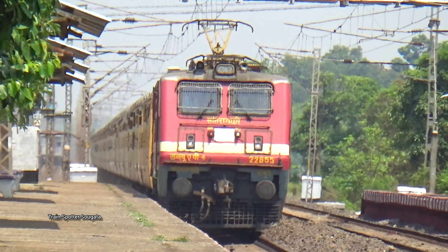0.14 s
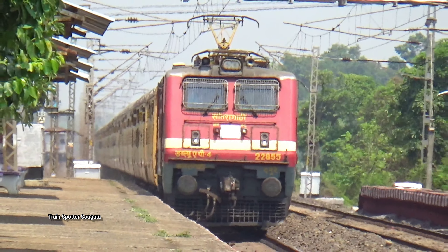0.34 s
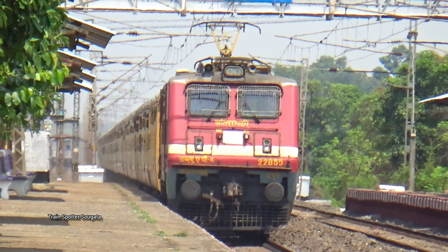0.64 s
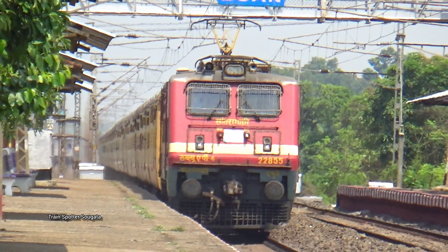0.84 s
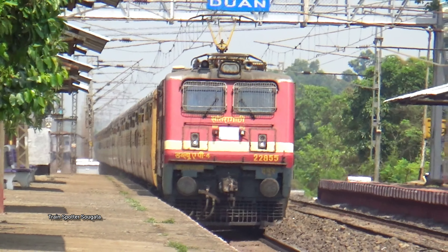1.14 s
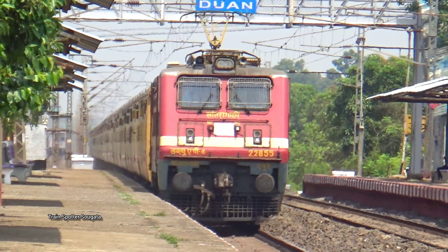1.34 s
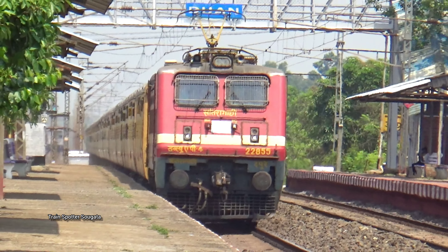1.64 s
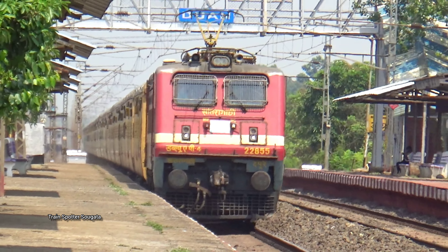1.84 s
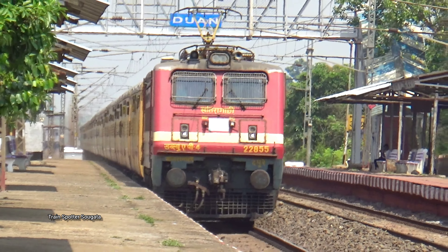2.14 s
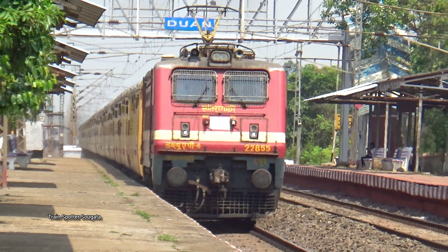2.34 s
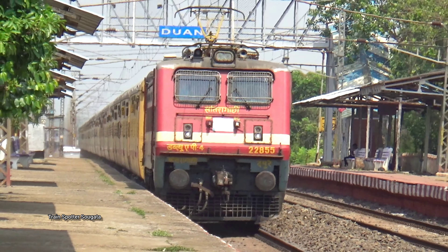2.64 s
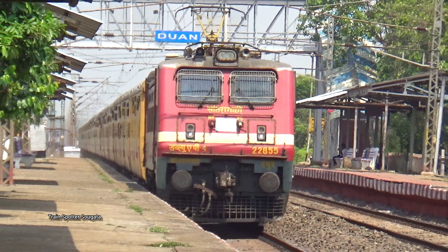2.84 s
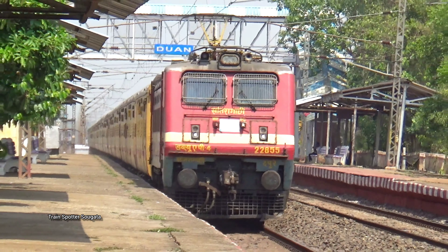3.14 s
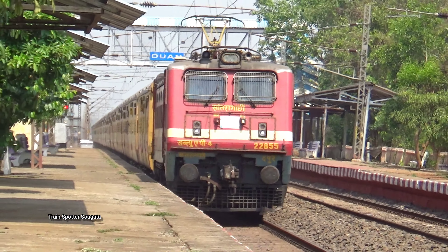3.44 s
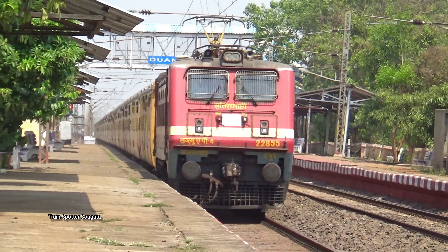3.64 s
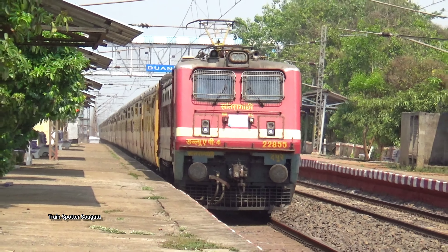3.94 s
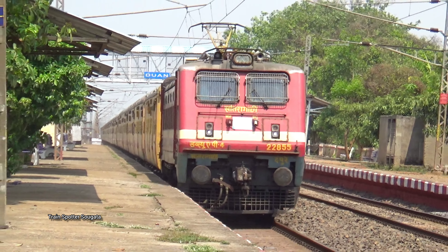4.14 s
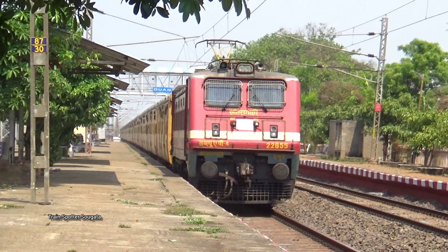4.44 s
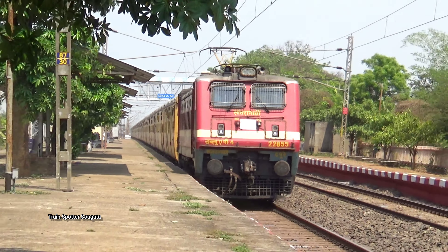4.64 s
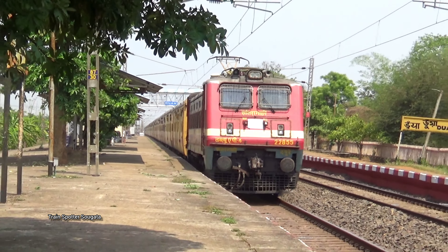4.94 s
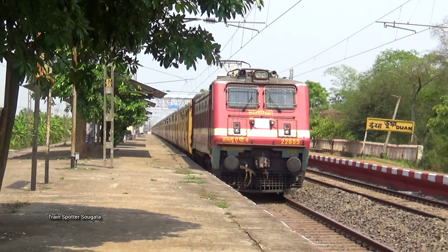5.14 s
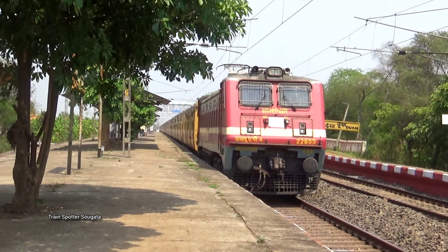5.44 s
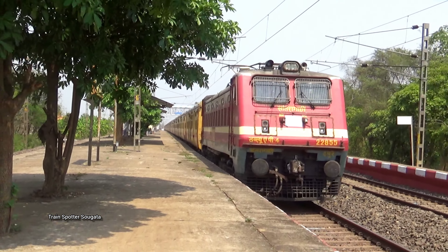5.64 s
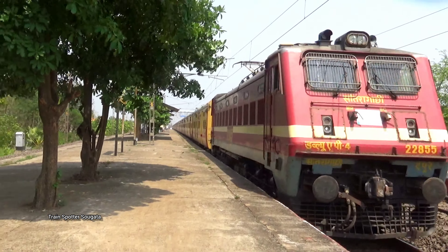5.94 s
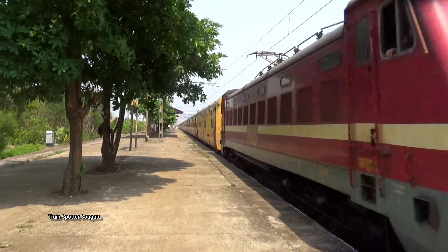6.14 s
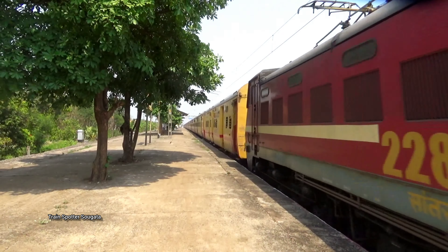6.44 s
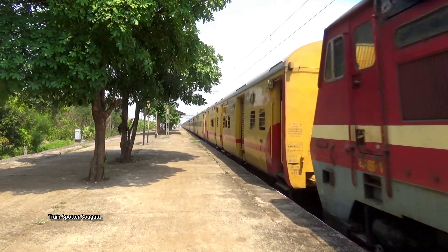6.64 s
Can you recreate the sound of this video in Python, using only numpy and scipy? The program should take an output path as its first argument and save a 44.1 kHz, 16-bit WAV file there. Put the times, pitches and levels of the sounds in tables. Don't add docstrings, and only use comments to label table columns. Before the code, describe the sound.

A handheld stereo microphone beside the track hears ringing rails, a steady motor whine and distant rolling noise growing nearer, with soft gusts and thin metallic squeaks. Then a buzzing, bright air horn takes over, its tone swept by a platform echo as the automatic level pulls the train down. After it stops, wheel sets sweep past in a dense mid-toned rush.

```python
import sys
import numpy as np
from scipy import signal
from scipy.fft import rfft, irfft, next_fast_len
from scipy.io import wavfile
from scipy.ndimage import uniform_filter1d

SR = 44100
rng = np.random.default_rng(int(sys.argv[2]) if len(sys.argv) > 2 else 0)


def transcribe(signal):
    frames = np.atleast_2d(signal).T
    limited = np.clip(frames, -1, 1)
    pcm = np.round(limited * 32767).astype(np.int16)
    wavfile.write(sys.argv[1], SR, pcm)


def volts(x):
    e = np.asarray(x, float) / 20
    return 10 ** e


N = 299439

# (time [s], level [dB])
HORN = [
    (4.215, -43),
    (4.251, -17.5),
    (4.266, -20),
    (4.32, -18.5),
    (4.361, -19),
    (5.55, -18),
    (5.887, -16.5),
    (5.95, -19.5),
    (6.24, -44),
]
# (level at the start [dB], rise while nearing [dB/s], ducking [dB], step as the wheels draw level [dB])
SONG = (-24, 2.5, 31, 5.5)
# (frequency [Hz], level [dB])
LEAN_RAILS = [(500, -2), (1000, -8), (1200, -8), (1300, -2), (3000, 0), (9000, 0)]
LEAN_HORN = [(60, -0.5), (150, -0.5), (380, -0.73), (950, 0.24), (2380, -0.52), (5980, -0.73), (15000, 0.0)]
# (frequency [Hz], phase [rad])
LEAD = [(0, 0), (1290, 0.65), (1980, 0.33), (6370, 0.68), (7240, 0.89), (7670, 0.58), (15200, 0.28)]
LEAD_HORN = [(0, 0), (600, 0.64), (2150, 0.47), (3270, 0.0053), (3530, 0.18), (5770, 0.043), (15200, 0.0)]
SONG_FULL_S = 2.98


def evened(x):
    return x / np.sqrt(np.mean(abs(x) ** 2) + 1e-20)


def read(points, hz):
    f, value = np.transpose(points)
    return np.interp(np.log(hz + 1), np.log(f + 1), value)


def curve(rows, t):
    s, *columns = np.transpose(rows)
    return [np.interp(t, s, c) for c in columns]


def bump(t, s, length):
    return np.exp(-((t - s) / length) ** 2)


def drift(t, top_hz):
    speeds = np.geomspace(top_hz / 12, top_hz, num=12)
    return evened(sum(np.sin(2 * np.pi * (f * t + rng.random())) for f in speeds))


def long_drift(t, top_hz):
    return drift(t[::64], top_hz).repeat(64)[:N]


def resonate(x, hz, width):
    turn = np.exp(2j * np.pi * hz * np.arange(x.shape[-1]) / SR)
    r = np.exp(-np.pi * width / SR)
    return 2 * (turn * signal.lfilter([1], np.convolve([1, -r], [1, -r]), x / turn)).real


def ports(pair, lean, lead):
    # (frequency [Hz], share [0-1])
    likeness = [(60, 1), (400, 0.99), (1000, 0.85), (2400, 0.92), (6000, 0.87), (15000, 0.97)]
    size = next_fast_len(N)
    hz = np.fft.rfftfreq(size, 1 / SR)
    a, b = rfft(pair, size)
    same = np.clip(read(likeness, hz), 0, 1)
    tilt = volts(read(lean, hz) / 2) * np.exp(.5j * read(lead, hz))
    left = a * tilt
    right = (same * a + np.sqrt(1 - same ** 2) * b) / tilt
    return irfft([left, right], size)[:, :N]


def noise(field_db, patchy_db, flicker_db):
    frames = N // 256 + 5
    hz = np.fft.rfftfreq(1024, 1 / SR)[:, None]
    t = np.arange(frames) * 256 / SR
    a, b, c, d, patches = rng.standard_normal((frames, 513, 5)).T
    patches = uniform_filter1d(patches, size=14, axis=0)
    patches = evened(uniform_filter1d(patches, size=12, axis=1))
    gain = volts(field_db(hz, t) + patchy_db * patches + flicker_db * drift(t, 30))
    spectra = np.array([a + 1j * b, c + 1j * d]) * gain
    return signal.istft(spectra, nperseg=1024, noverlap=768)[1][:, :N]


def layer_db(layer, t, full_s=9):
    # (time [s], share of the ducking [0-1])
    ducking = [
        (4.23, 0.04),
        (4.3, 0.65),
        (4.6, 0.8),
        (5.85, 0.88),
        (5.98, 0.68),
        (6.25, 0.66),
        (6.5, 0.49),
        (6.79, 0.58),
    ]
    level_s, level_rise_s = 6.27, 0.02
    start_db, rise_db, duck_db, level_db = layer
    wheels = 1 / (1.5 + np.exp((level_s - t) / level_rise_s))
    nearing_db = rise_db * np.minimum(t, full_s)
    return start_db + nearing_db - duck_db * curve(ducking, t)[0] + level_db * wheels


def axles_db(t):
    # (time [s], level [dB])
    axles = [
        (6.08, 0),
        (6.19, 8.5),
        (6.34, 11),
        (6.47, 3.5),
        (6.64, 3),
    ]
    return sum(db * bump(t, s, 0.053) for s, db in axles)


def wind():
    # (frequency [Hz], density [dB/Hz])
    colour = [(20, -11), (60, -14), (150, 1.5), (300, -3), (600, -15.5), (2000, -66)]
    # (time [s], level [dB], length [s])
    gusts = [(.07, -45, 0.069), (0.266, -49, 0.083), (.6, -52, 0.15), (0.799, -40.5, 0.033),
             (1.43, -38, 0.041), (1.76, -53, .04), (3.5, -63, 0.13), (4.074, -47, 0.039),
             (4.297, -36, 0.047), (4.62, -47, 0.13), (5.13, -51, .06), (5.432, -45, 0.035),
             (5.607, -48, .04), (6.3, -51, 0.092), (6.54, -46, 0.056), (6.66, -51, .04), (6.79, -36, .05)]
    breeze_db = -52

    def field_db(hz, t):
        power = volts(2 * breeze_db) + sum(volts(2 * db) * bump(t, s, length) for s, db, length in gusts)
        return read(colour, hz) + 10 * np.log10(power)

    lumps = noise(field_db, patchy_db=0.0, flicker_db=2.5)
    return volts(-8.5) * np.array([lumps[0], 0.81 * lumps[0] + 0.52 * lumps[1]])


def yard(x):
    # (frequency [Hz], time to fall 60 dB [s])
    decay = [(300, 0.057), (1000, 0.043), (4000, 0.75), (12000, 0.55)]
    taps = np.zeros((2, SR // 2))
    slots = np.arange(400, SR // 2 - 20, 20)
    at = slots + rng.integers(0, 20, (2, len(slots)))
    np.put_along_axis(taps, at, rng.choice([-1., 1.], at.shape), 1)
    hz, t, z = signal.stft(taps, SR, nperseg=256)
    tail = signal.istft(z * volts(-60 * t / read(decay, hz)[:, None]), SR, nperseg=256)[1]
    return signal.fftconvolve(x.mean(0)[None], tail / np.linalg.norm(tail[0]), axes=1)[:, :N]


def whine():
    pitches = [523, 1079]
    levels = [-25, -6.5]
    waver_hz, swell_db = 2, 2
    t = np.arange(N) / SR
    tones = np.zeros(N)
    for hz, db in zip(pitches, levels):
        turns = np.cumsum(hz + waver_hz * long_drift(t, 12)) / SR
        tones += volts(db + swell_db * long_drift(t, 6.2)) * np.sin(2 * np.pi * turns)
    return volts(layer_db(SONG, t, SONG_FULL_S)) * ports([tones, 0 * tones], LEAN_RAILS, LEAD)


def rails():
    pitches = [494, 523, 1050, 1080, 1140, 1178, 1260, 1319, 1540, 3188, 4130, 7000, 9480]
    # (width [Hz], level [dB])
    modes = [(13.9, -29.5), (6, -34), (22, -10), (14, -8), (48.4, 1.5), (25.5, -7), (44, -23),
             (17.2, -16.5), (32, -27.5), (6, -38.5), (20, -40.5), (400, -34.5), (300, -31.5)]
    size, t = next_fast_len(N), np.arange(N) / SR
    f = np.fft.rfftfreq(size, 1 / SR)
    shake = rfft(rng.standard_normal((2, N)) * [[1], [.35]], size)
    song = np.zeros((2, N))
    for hz, (width, db) in zip(pitches, modes):
        ring = irfft(shake / (1 + 2j * (f - hz) / width) ** 2, size)[:, :N]
        song += volts(db + 1.9 * long_drift(t, 2.733)) * evened(ring)
    level_db = layer_db(SONG, t, SONG_FULL_S) + axles_db(t) - 2.0
    return volts(level_db) * ports(evened(song), LEAN_RAILS, LEAD)


def roar():
    # (time [s], share of the passing colour [0-1])
    nearness = [
        (0, 0.29),
        (4.2, 0.46),
        (5.9, 0.55),
        (6.3, 1),
        (6.8, 1),
    ]
    # (frequency [Hz], density [dB/Hz])
    far_colour = [(30, -33), (100, -46), (300, -28.5), (470, -16.5), (545, -18), (630, -17), (850, -0.5),
                  (1320, -1.5), (1370, -22), (2150, -18), (4000, -24), (6000, -35), (8200, -30.5),
                  (10500, -19), (15500, -31)]
    near_colour = [(30, -62), (120, -15.5), (400, 0.5), (900, 5.5), (1400, 0), (2200, -10), (3200, -12),
                   (5700, -23.5), (9500, -24.5), (11500, -34), (15500, -59)]
    # (frequency [Hz], level [dB])
    lean_far = [(100, -4), (400, -4.5), (1000, -1), (2400, 2.5), (8000, 0)]
    lean_near = [(60, -17), (180, 3.5), (550, -3.5), (1650, -4), (4970, -4.5), (15000, 1)]
    # (start [dB], rise [dB/s], ducking [dB], step at the wheels [dB])
    low_layer = (-39, 3.5, 20.5, 0.5)
    treble_layer = (-56.5, 3.5, 8, 3.5)

    def field_db(hz, t):
        low_db = layer_db(low_layer, t) + 0.067 * axles_db(t)
        high_db = layer_db(treble_layer, t) + 0.23 * axles_db(t)
        treble = np.clip(np.log2((hz + 1) / 1200), 0, 1)

        def levelled(colour):
            return read(colour, hz) - (1 - treble) * read(colour, 790) - treble * read(colour, 2370)

        far, near = levelled(far_colour), levelled(near_colour)
        return far + curve(nearness, t)[0] * (near - far) + low_db + treble * (high_db - low_db)

    pair = noise(field_db, patchy_db=0.92, flicker_db=0.67)
    near, = curve(nearness, np.arange(N) / SR)
    return volts(-9) * ((1 - near) * ports(pair, lean_far, LEAD) + near * ports(pair, lean_near, LEAD))


def squeals():
    # (time [s], length [s], frequency [Hz], width [Hz], level [dB])
    friction = [
        (.93, 0.052, 1900, 50, -48),
        (1.4, 0.048, 13000, 2520, -60),
        (2.19, .07, 13100, 500, -50),
        (2.3, 0.34, 13000, 120, -59),
        (3.05, 0.086, 12700, 1500, -46),
        (3.23, .06, 13000, 902.3, -52),
        (3.93, .07, 12040, 2500, -41),
    ]
    # (time [s], length [s], frequency [Hz], width [Hz], level [dB])
    puff = [
        (4.215, 0.021, 8740, 150, -31),
        (4.205, 0.055, 9250, 4000, -33),
        (4.202, .03, 14000, 1490, -45),
    ]
    # (time [s], length [s], overtone [number], level [dB])
    squeak = [
        (4.2, .05, 5, -28),
        (4.2, .04, 9, -27),
        (4.197, .042, 10, -20),
        (4.215, .04, 11, -30),
    ]
    squeak_hz, squeak_width_hz = 324, 40
    valve = [(s, length, k * squeak_hz, squeak_width_hz, db) for s, length, k, db in squeak]
    out = np.zeros((2, N))
    for s, length, hz, width, db in friction + puff + valve:
        burst = resonate(rng.standard_normal((2, 12000)), hz, width)
        burst = burst[:, 1000:][:, :round(length * SR)]
        count = burst.shape[1]
        out[:, round(s * SR):][:, :count] += volts(db) * evened(burst) * np.hanning(count) ** .5
    return ports(out, LEAN_HORN, LEAD_HORN)


SETTLED_HZ = 317.2


def horn_hz(t):
    slack_hz, fill_s, sag_hz_per_s = 18, .075, .6
    shut_s, empty_s, empty_hz = 5.88, .04, 8
    since = t - HORN[0][0]
    filling = slack_hz * np.exp(-since / fill_s)
    emptying = empty_hz * (1 - np.exp(-np.maximum(t - shut_s, 0) / empty_s))
    return SETTLED_HZ + filling - sag_hz_per_s * since + emptying


def horn():
    # (frequency [Hz], level [dB])
    bell = [(316, -8), (633, -11), (950, 0.5), (1266, -7), (2200, -7.5), (2900, -10), (4100, -17.5),
            (6000, -26.5), (7300, -18.5), (8300, -17), (9200, -12.5), (10100, -16.5), (11000, -21.5),
            (15500, -41)]
    # (time [s], lag [ms])
    ground_lag = [
        (4.215, .08),
        (4.43, .135),
        (4.6, .245),
        (5.0, .4),
        (5.15, .44),
        (5.45, .63),
        (5.7, .93),
        (5.85, 1.26),
        (6.24, 2.8),
    ]
    top_khz = [.35, .5, 3.8, 4.3, 17, 16, 8, 1.1, .25]
    ground, roof = 0.77, 0.12
    rough_ms = 0.44
    slack_db_per_hz, choke_s, choke_db = 1.22, 0.51, -6.5

    size = next_fast_len(round((HORN[-1][0] - HORN[0][0]) * SR))
    t = HORN[0][0] + np.arange(size) / SR
    slow = t[::32]
    s, db = np.transpose(HORN)
    pressure_db = np.interp(slow, s, db)
    reach_khz = np.exp(np.interp(slow, s, np.log(top_khz)))
    delay_ms, = curve(ground_lag, slow)
    turns = np.cumsum(horn_hz(t) + .2 * drift(t, 25)) / SR
    boom_db = slack_db_per_hz * (horn_hz(slow) - SETTLED_HZ) + choke_db * bump(slow, HORN[4][0], choke_s)

    spin, phasor, tone = np.exp(2j * np.pi * turns), 1, np.zeros((2, size))
    eddies = [drift(slow, 130) for _ in range(6)]
    for k in range(1, 49):
        f = 316.5 * k
        top = min(f / 9000, 1)
        lag = np.exp(-2j * np.pi * f * delay_ms / 1000)
        echo = 1 + ground * np.exp(-top * delay_ms / rough_ms) * lag + roof * lag ** 2.76
        share = k / 12 % 1 * np.pi / 2
        eddy = np.cos(share) * eddies[k // 12] + np.sin(share) * eddies[k // 12 + 1]
        waver = (.08 + .05 * min(k, 3)) * (drift(slow, 10) + 1j * drift(slow, 9))
        flutter = np.exp(waver + .36 * top ** 1.6 * eddy)
        apart = np.exp((0.11 + 0.024 * top) * 1j * drift(slow, 8) * np.array([[1], [-1]]))
        spread = np.exp(1j * (.006 * k * k + .55 * top * rng.standard_normal()))
        colour_db = read(bell, f) - 45 * np.maximum(np.log2(f / reach_khz / 1000), 0)
        gain = volts(colour_db + boom_db * (k == 1)) * echo * flutter * apart * spread
        phasor = phasor * spin
        tone += (gain.repeat(32, axis=1)[:, :size] * phasor).real

    puffs = 0.64 + np.exp(-(turns % 1) / 0.54)
    puffs = puffs * ([[1, -0.067], [1, -0.014]] @ rng.standard_normal((2, size)))
    hz = np.fft.rfftfreq(size, 1 / SR)
    hiss = irfft(rfft(puffs) * volts(read(bell, hz)) * hz ** 1.2, size)
    hiss *= np.interp(t, [4.32, 4.36, 5.9, 6.02], [0.073, 1, 0.68, 0.11])
    leak_db = np.interp(t, [5.45, 5.75], [-20, -14.5])
    both = volts(np.interp(t, slow, pressure_db)) * (evened(tone) + volts(leak_db) * evened(hiss))
    tilt = volts(read(LEAN_HORN, hz) / 2) * np.exp(.5j * read(LEAD_HORN, hz))
    out = np.zeros((2, N))
    out[:, round(t[0] * SR):][:, :size] = irfft(rfft(both) * [tilt, 1 / tilt], size)
    return out


def scene():
    blast = horn()
    train = whine() + rails() + roar()
    return wind() + train + squeals() + blast + volts(-11.0) * yard(blast)


def roll_off(x):
    return signal.sosfilt(signal.butter(12, 15670, fs=SR, output="sos"), x)


def record(dry):
    soft = 0.97 * np.tanh(dry / 0.86)
    edge = signal.firwin(511, 15700, window=("kaiser", 9), fs=SR)
    cut = signal.oaconvolve(soft, edge[None], "same")
    return roll_off(cut)


dry = scene()
out = record(dry)
transcribe(out)
```